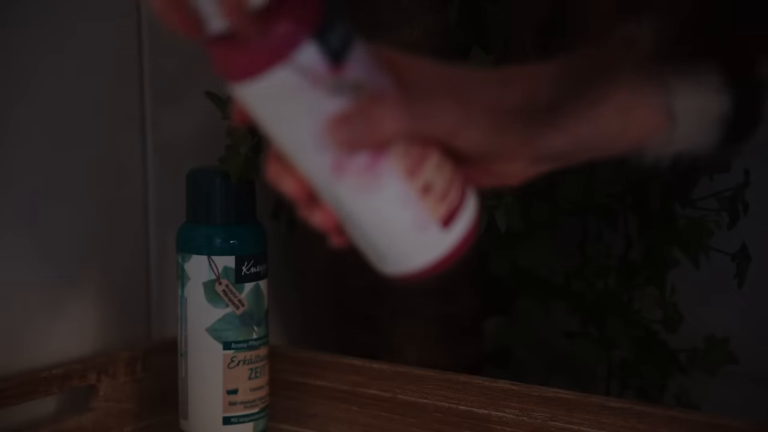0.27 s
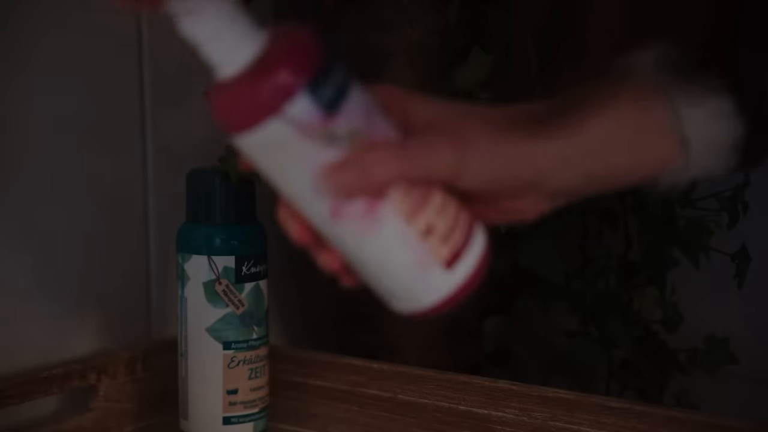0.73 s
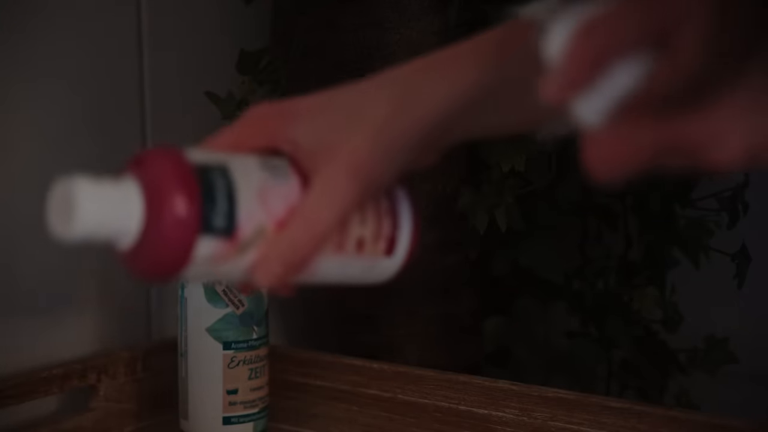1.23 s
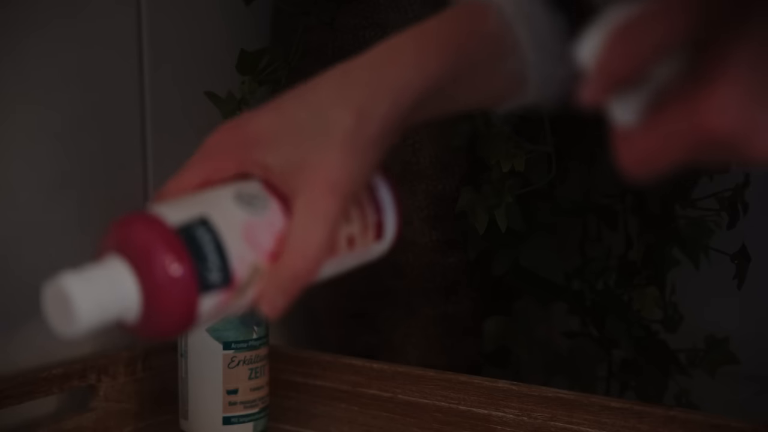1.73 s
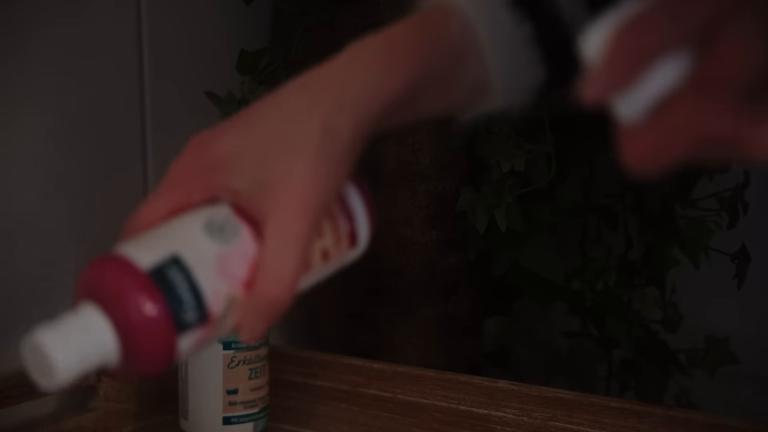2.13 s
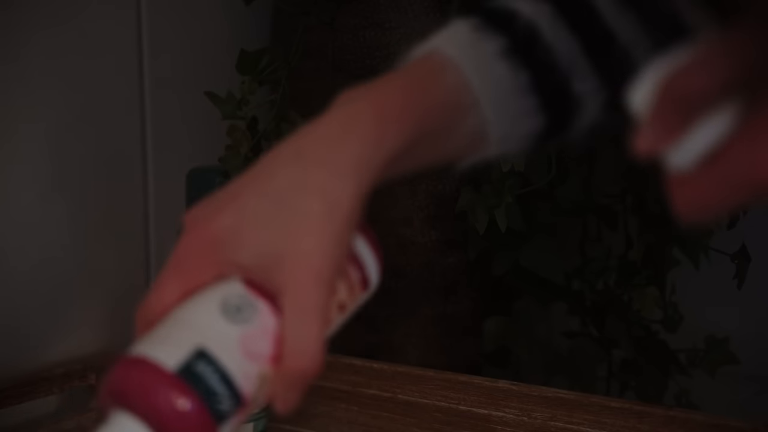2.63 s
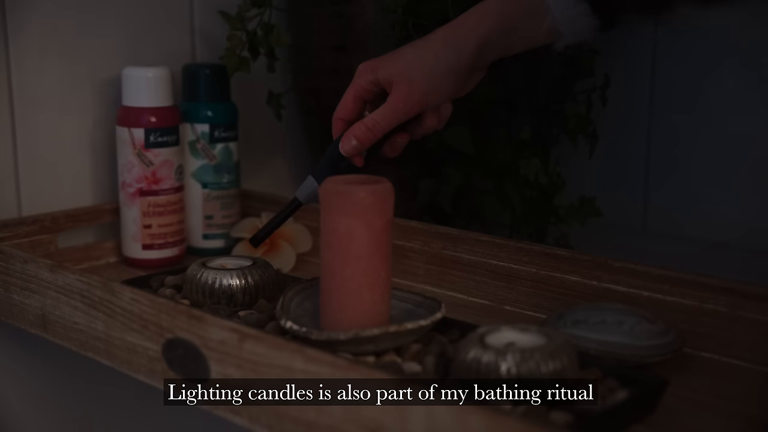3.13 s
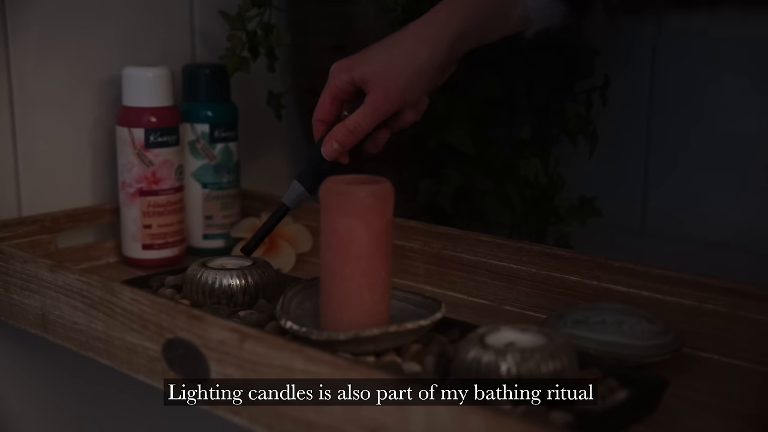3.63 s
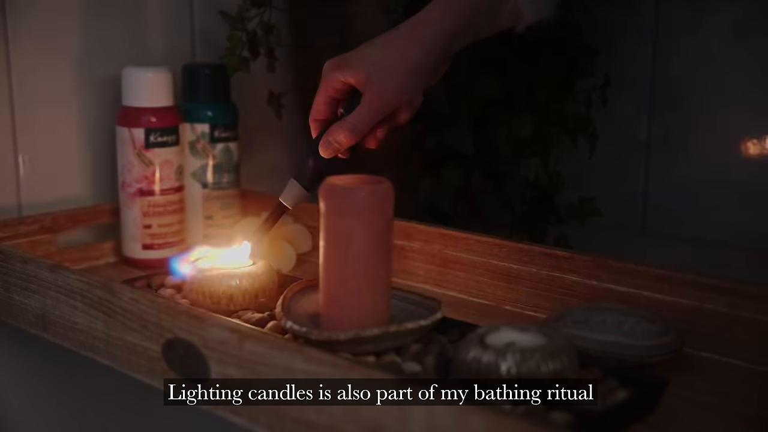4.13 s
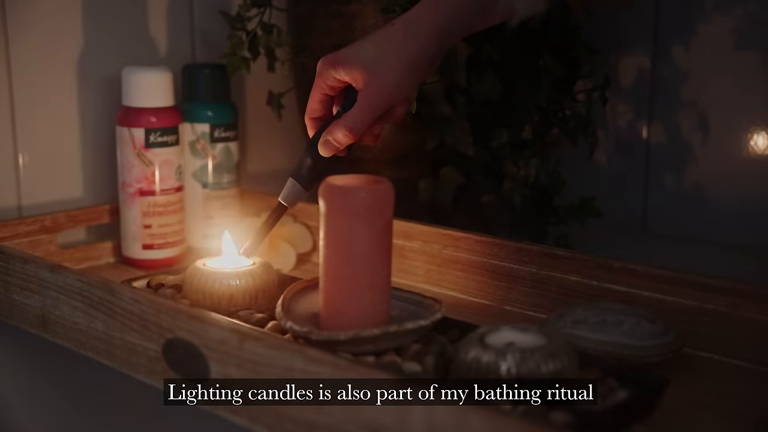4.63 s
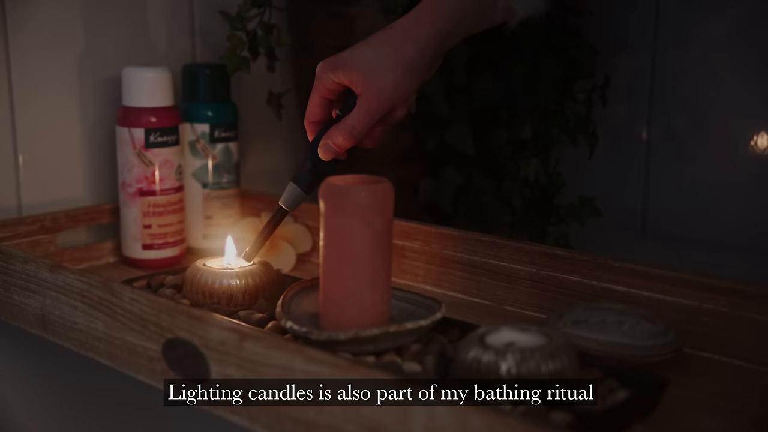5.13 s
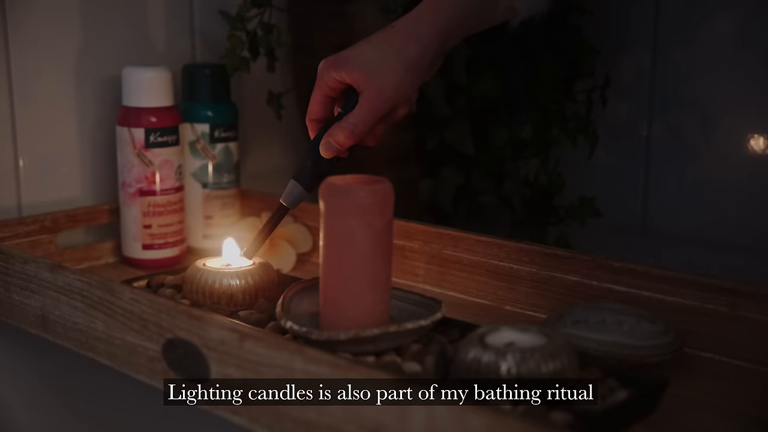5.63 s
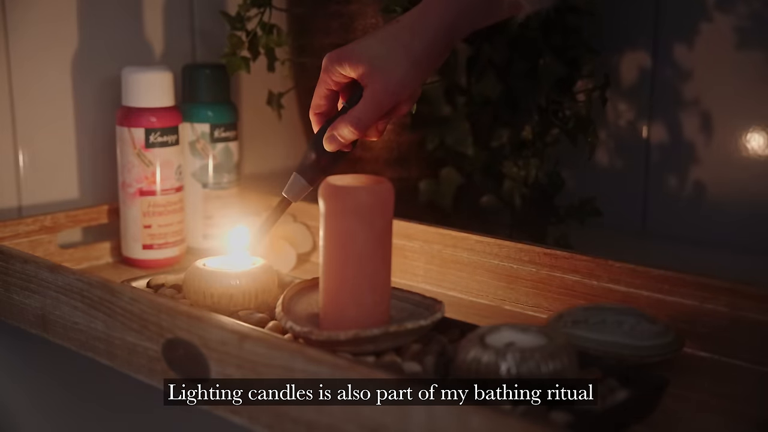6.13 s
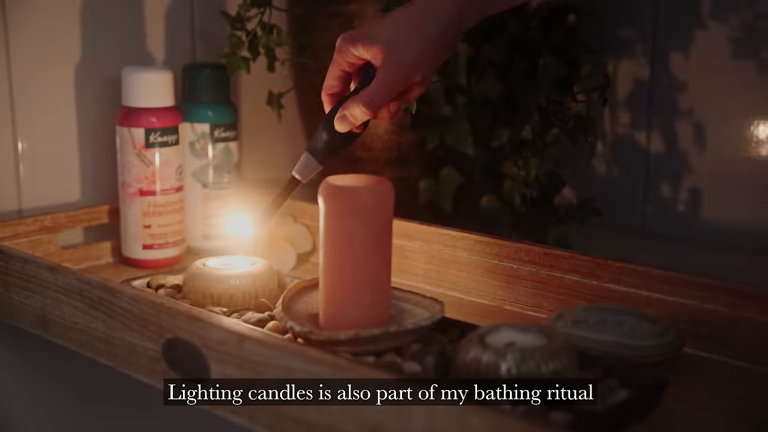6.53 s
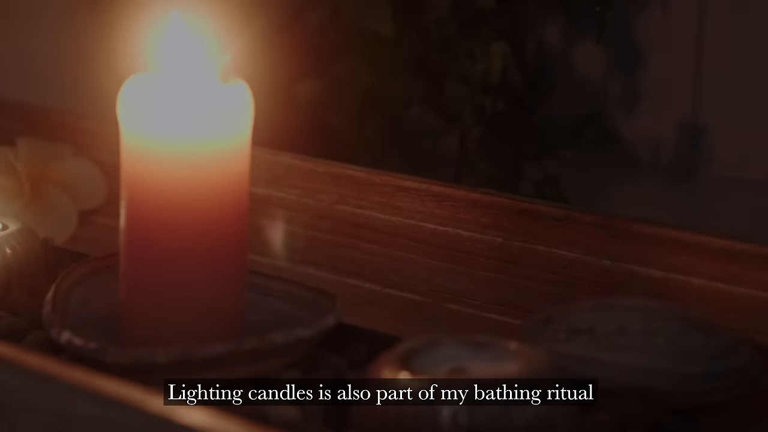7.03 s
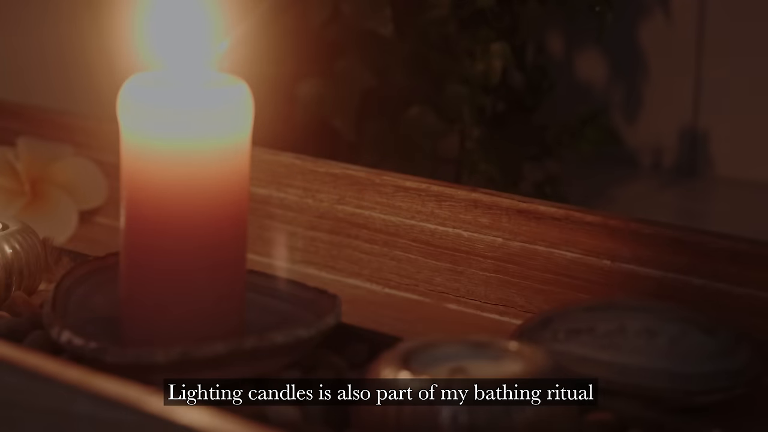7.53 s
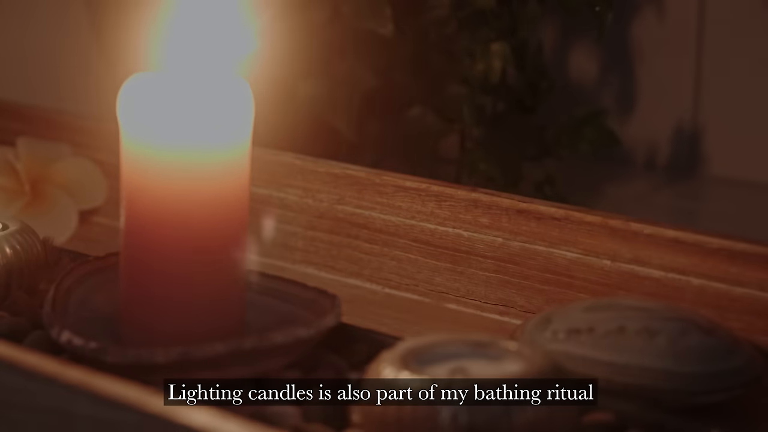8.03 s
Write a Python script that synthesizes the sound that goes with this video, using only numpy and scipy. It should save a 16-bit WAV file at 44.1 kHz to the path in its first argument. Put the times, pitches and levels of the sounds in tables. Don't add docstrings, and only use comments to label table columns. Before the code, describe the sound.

A bright, bubbly tap stream fills a bathtub and fades smoothly. Then near silence: cloth rubs briefly, a plastic lighter clicks and knocks in the hand, and its igniter cracks once, far louder than everything else, with a short tiled reverberation. Gas puffs softly; the nozzle scrapes a dish, a candle wick crackles, and a distant bird whistles barely audibly over low room tone. Essentially mono, in a small hard room.

```python
import sys
import numpy as np
from scipy import signal
from scipy.fft import rfft, irfft, next_fast_len
from scipy.io import wavfile
from scipy.ndimage import uniform_filter1d

SR = 44100
rng = np.random.default_rng(int(sys.argv[2]) if len(sys.argv) > 2 else 0)


def level_to_linear(level):
    exponent = np.asarray(level, float) / 20
    return 10 ** exponent


def to_wav(s):
    ch = np.atleast_2d(s).T
    pcm = np.round(np.clip(ch, -1, 1) * 32767)
    wavfile.write(sys.argv[1], SR, pcm.astype(np.int16))


N = 365141
CHANGE_S = 2.836
EDGE_HZ = 15760
HAMMER_DB_AFTER = 11


def clock():
    return np.arange(N) / SR


def evened(x):
    return x / np.sqrt(np.mean(x ** 2) + 1e-20)


def slow(seconds):
    size = max(round(seconds * SR), 2)
    once = uniform_filter1d(rng.standard_normal(N), size)
    return evened(uniform_filter1d(once, size))


def read(points, hz):
    f, value = np.transpose(points)
    return np.interp(np.log(hz + 1), np.log(f + 1), value)


def coloured(x, spectrum, peaks=()):
    size = next_fast_len(N)
    hz = np.fft.rfftfreq(size, 1 / SR)
    db = read(spectrum, hz)
    for f, width, boost in peaks:
        db = db + boost / (1 + (2 * (hz - f) / width) ** 2)
    return evened(irfft(rfft(x, size) * level_to_linear(db) * (hz < EDGE_HZ), size)[:N])


def causal(spectrum):
    db = read(spectrum, abs(np.fft.fftfreq(4096, 1 / SR)))
    log_gain = np.log(level_to_linear(np.maximum(db, -70)))
    taps = np.fft.ifft(np.exp(np.conj(signal.hilbert(log_gain)))).real[:1024]
    return taps / np.linalg.norm(taps)


def limited(x):
    return signal.oaconvolve(x, signal.firwin(511, EDGE_HZ, window=("kaiser", 9), fs=SR), "same")


def patchy(patchy_db, flicker_db, span):
    frames = N // 128 + 5
    a, b, patches = rng.standard_normal((frames, 257, 3)).T
    patches = uniform_filter1d(patches, 6, 0)
    patches = evened(uniform_filter1d(patches, span, 1))
    flicker = evened(uniform_filter1d(rng.standard_normal(frames), span // 2))
    z = (a + 1j * b) * level_to_linear(patchy_db * patches + flicker_db * flicker)
    return signal.istft(z, nperseg=512, noverlap=384)[1][:N]


def add(mix, s, sound):
    part = mix[round(s * SR):][:len(sound)]
    part += sound[:len(part)]


# frequency in Hz, time to fall by 60 dB in seconds.
TILE_DECAY = [(500, 0.67), (1320, 0.5), (3480, 0.44), (5400, 0.44), (7700, .35), (11000, 0.33),
              (15500, 0.2)]


def tiles(x):
    taps = rng.choice([-1., 1.], SR) * (rng.random(SR) < .3)
    hz, t, z = signal.stft(taps, SR, nperseg=128)
    decay = level_to_linear(-60 * t / read(TILE_DECAY, hz)[:, None])
    tail = signal.istft(z * decay, SR, nperseg=128)[1]
    build_up_s = 0.003
    tail = tail * (1 - np.exp(-(np.arange(len(tail)) / SR / build_up_s) ** 2))
    return signal.fftconvolve(x, tail / np.linalg.norm(tail))[:N]


def ticks(rows, modes):
    out, t = np.zeros(N), np.arange(600) / SR
    click = np.exp(-t * 18000) - .17 * np.exp(-t * 3000)
    for s, db, mode_db, top_db, thud_db, ms in rows:
        weights = [0, 0, mode_db, top_db, top_db, thud_db]
        body = level_to_linear(14 + top_db) * click
        for (hz, width, mode_gain), weight in zip(modes, weights):
            ring = np.exp(-np.pi * width * t) * np.sin(2 * np.pi * hz * t)
            body = body + level_to_linear(mode_gain + weight) * ring
        rattle = rng.standard_normal(600) * np.exp(-(1000 * t / max(ms, .15)) ** 2)
        tick = np.convolve(rattle, body)
        add(out, s, level_to_linear(db) * tick / abs(tick).max())
    return out


# frequency in Hz, density in dB per Hz.
HUSH = [(15, -60), (30, -22), (42, -4.5), (55, 1.5), (75, -9), (113, -17), (221, -15), (510, -19),
        (724, -20.5), (1080, -17.5), (1710, -24), (2780, -27.5), (5500, -36), (15600, -53.5)]
# frequency in Hz, width in Hz, boost in dB.
PIPE = [(1130, 30, 6.5), (955.4, 20, 5), (1230, 20, 2), (1470, 20, 6.5)]


def hush():
    room_db, hiss_db = -69.5, -80.5
    room = coloured(patchy(patchy_db=0.6, flicker_db=-0.7, span=30), HUSH, PIPE)
    return (level_to_linear(room_db) * room + level_to_linear(hiss_db) * rng.standard_normal(N)) * (clock() > CHANGE_S)


# time in seconds, level in dB.
SURGES = [
    (3.12, -75),
    (3.5, -79.5),
    (4.11, -71.5),
    (6.88, -77),
    (7.14, -80),
    (7.4, -75),
]


def drone():
    t = clock()
    level = level_to_linear(-87.5 + 3.5 * slow(seconds=.1))
    rise_s, fall_s = 0.033, 0.09
    for s, db in SURGES:
        level = level + level_to_linear(db) * np.exp(-np.maximum((s - t) / rise_s, (t - s) / fall_s))
    wander = evened(uniform_filter1d(rng.standard_normal(N), 3000))
    hz = 1090 + 5.5 * wander
    return (t > CHANGE_S) * level_to_linear(2.0) * level * np.sin(2 * np.pi * np.cumsum(hz) / SR)


# start in seconds, first, middle and last frequency in Hz, level in dB.
BIRD = [
    (6.0, 5950, 6920, 5650, -89),
    (7.9, 6450, 5860, 5000, -88),
]


def bird():
    whistle_s = .21
    out, u = np.zeros(N), np.arange(0, 1, 1 / (whistle_s * SR))
    for start, first_hz, middle_hz, last_hz, db in BIRD:
        arch = (2 * middle_hz - first_hz - last_hz) * 2 * u * (1 - u)
        hz = first_hz + (last_hz - first_hz) * u + arch
        add(out, start, level_to_linear(db) * np.sin(np.pi * u) * np.sin(2 * np.pi * np.cumsum(hz) / SR))
    return out * level_to_linear(1.6 * slow(seconds=.005))


# time in seconds, peak in dB, rattle length in milliseconds.
SPITS = [
    (6.8727, -40.5, 0.27),
    (6.8740, -45, 0.62),
    (6.8757, -46.5, 2.5),
    (6.9614, -64, 2.5),
]
# level in dB of the third mode, of the top, of the thud.
SPIT_COLOUR = (-6, -20, -4)
# frequency in Hz, width in Hz, level in dB.
WAX = [(2470, 500, -9), (3380, 1100, 14), (4600, 1200, 10), (7000, 1700, 2), (12500, 3300, 25),
       (466, 300, 5)]


def wick():
    return ticks([(s, db, *SPIT_COLOUR, ms) for s, db, ms in SPITS], WAX)


# frequency in Hz, density in dB per Hz.
CLOTH = [(88, -53), (150, -45), (297, 3), (348, -7), (504, -13), (612, -3.5), (960, -6.5), (1290, 2),
         (1630, -7), (2810, -5), (3160, -8), (12400, -20), (16000, -31)]


def sleeve():
    t = clock()
    top_s, settled_s = 2.984, 3.35
    before, after = np.maximum(top_s - t, 0), np.maximum(t - top_s, 0)
    stroke_db = -50.5 - 39 * before - 128 * after
    settle_db = -62.5 - 32 * after
    level_db = np.maximum(stroke_db, settle_db)
    bright_db = level_db - 11.5 - 41 * before
    clumps_db = 1.3 * uniform_filter1d(rng.exponential(1, N), 4) ** 2
    snags = evened(rng.standard_normal(N) * level_to_linear(np.minimum(clumps_db, 14)))
    rustle = evened(patchy(patchy_db=-2.0, flicker_db=-0.5, span=8))
    cloth = coloured(snags + 1.7 * rustle, CLOTH)
    low = signal.sosfiltfilt(signal.butter(4, 4800, fs=SR, output="sos"), cloth)
    moving = (t > CHANGE_S) & (t < settled_s)
    return moving * (level_to_linear(level_db) * evened(low) + level_to_linear(bright_db) * evened(cloth - low))


# start in seconds, length in seconds, first level in dB, last level in dB.
GRIP = [
    (2.836, 0.81, -68, -86.5),
    (3.9, 0.16, -93, -82),
    (4.9, .3, -92.5, -92),
    (5.6, 0.84, -91, -98),
]
# frequency in Hz, density in dB per Hz.
GRIP_RING = [(3000, -44), (4900, -8.5), (5400, -5.5), (5900, -9.5), (9000, -35)]


def grip():
    level = np.zeros(N)
    for start, length, first_db, last_db in GRIP:
        add(level, start, level_to_linear(np.linspace(first_db, last_db, round(length * SR))))
    rub = coloured(patchy(patchy_db=3.0, flicker_db=1.5, span=4), GRIP_RING)
    return uniform_filter1d(level, 400) * rub


# time in seconds, peak in dB.
CRISP = [(3.0944, -56), (3.1667, -51), (3.3692, -48.5), (3.5164, -52), (3.5534, -55.5), (5.7554, -56.5),
         (6.0694, -66), (6.1244, -62)]
DULL = [(3.4032, -51), (3.7648, -56.5), (3.9509, -55), (3.9814, -53.5), (4.0294, -60), (4.0522, -52),
        (4.9336, -62), (5.1094, -64), (5.1294, -63)]
KNOCK = [(2.8734, -45.5), (2.9891, -45), (3.2314, -50.5), (5.8684, -63), (7.9244, -66)]
# level in dB of the 5 kHz mode, of the top above 7 kHz, of the thud
# under 1.5 kHz, then rattle length in milliseconds.
CRISP_COLOUR = (-13, -11.5, -11.5, 4)
DULL_COLOUR = (-18, -25, -16.5, 4.5)
KNOCK_COLOUR = (-9, -16, 3, 4.5)
# frequency in Hz, width in Hz, level in dB.
SHELL = [(2500, 500, -14), (3640, 430, 1.5), (5304, 260, 10), (8975, 3300, 17.5), (13000, 3500, 15),
         (600, 400, 3.5)]
# time in seconds, peak in dB, top above 7 kHz in dB, scrape length in milliseconds.
SCRAPES = [
    (5.6204, -57, -30, 9.0),
    (5.6794, -49.5, -10, 5.0),
    (5.69, -53.5, -30, 3.0),
    (5.7034, -60, -26, 4.0),
    (6.184, -56, -26, 3.3),
    (6.3414, -59, -24, 3.5),
]
# frequency in Hz, width in Hz, level in dB.
DISH = [(2920, 500, 4), (3800, 1200, 7), (5450, 700, 6), (8500, 3000, 12), (12000, 3500, 16),
        (1300, 1200, 14)]


def lighter():
    kinds = [(CRISP, CRISP_COLOUR), (DULL, DULL_COLOUR), (KNOCK, KNOCK_COLOUR)]
    touches = [(*row, *colour) for rows, colour in kinds for row in rows]
    mode_db, thud_db = -3, -3
    scrapes = [(s, db, mode_db, top_db, thud_db, ms) for s, db, top_db, ms in SCRAPES]
    return ticks(touches, SHELL) + ticks(scrapes, DISH)


def flare():
    t = np.maximum(clock() - 4.095, 0)
    rise_s = .04
    level = np.minimum(t / rise_s, 1) * level_to_linear(-49.5 - 85 * t)
    spectrum = [(30, -6), (60, 1), (130, -8.5), (300, -10), (700, -10), (1100, -38.5)]  # (Hz, dB per Hz)
    return level * coloured(rng.standard_normal(N), spectrum)


# time in seconds, peak in dB.
SNAP = [
    (4.0894, -3.5),
    (4.0900, -5),
    (4.091, -3.5),
    (4.092, -6),
    (4.0926, -11),
    (4.0938, -11),
]


def thump():
    out, u = np.zeros(N), np.arange(0, 1, 140 / SR)
    add(out, SNAP[0][0], level_to_linear(-50) * np.sin(2 * np.pi * u) * np.sin(np.pi * u))
    return out


# frequency in Hz, density in dB per Hz.
HAMMER = [(290, -68.5), (500, -47), (952, -33.5), (1520, -13.5), (2040, -18.5), (3500, 4.5), (4050, -9),
          (4900, -1), (6560, -13), (11800, -14), (12700, -13.5), (15600, -28.5), (16500, -42.5),
          (17200, -70)]
# frequency in Hz, density in dB per Hz.
AFTER = [(290, -60), (500, -38.5), (1200, -24), (1770, -0.5), (2080, -14.5), (2330, -2.5), (3070, -4.5),
         (3590, -3), (4210, -10.5), (4720, -0.5), (5860, -15), (7380, -16), (8520, -23.5), (12400, -20),
         (15600, -27.5)]


def snap():
    direct, blow = np.zeros(N), np.zeros(N)
    contact_s = 0.00033
    dying = np.exp(-np.arange(300) / SR / contact_s)
    for s, db in SNAP:
        hit = np.convolve(rng.standard_normal(300) * dying, causal(HAMMER))
        add(direct, s, level_to_linear(db) * hit / abs(hit).max())
    add(blow, SNAP[0][0], causal(AFTER))
    return direct + level_to_linear(HAMMER_DB_AFTER) * limited(tiles(blow))


def bubble(hz, cycles, glide):
    u = np.arange(int(3 * cycles * SR / hz)) * hz / SR / cycles
    return np.sin(2 * np.pi * cycles * (u + glide * u ** 2)) * u * np.exp(1 - u * 2) * 2


def fizz():
    out, size = np.zeros(N), 3 * SR
    for hz in np.geomspace(250, 15000, 36):
        strength = level_to_linear(3.37 * np.minimum(rng.exponential(1, size), 4))
        births = (rng.random(size) < 200 / SR) * strength
        swarm = signal.oaconvolve(births, bubble(hz, cycles=5.5, glide=0.038))[:size]
        out[:size] += np.sqrt(hz) * evened(swarm)
    return out / out[:size].std()


# frequency in Hz, density in dB per Hz.
JET = [(110, -38.5), (180, -30.5), (209, -22), (417, -18.5), (475, -8), (703, -12), (897, -7), (1890, -6),
       (2370, -6), (2800, -1.5), (4640, -5), (5280, -2.5), (8420, -12), (12500, -12), (15600, -19.5)]
# frequency in Hz, width in Hz, boost in dB.
TUB = [(211.6, 21, 11), (324, 14, 2.5), (480.5, 12.2, 4.5), (536, 31, 0), (890, 76, 4.5), (1520, 120, 3),
       (1900, 100, 5.5), (2780, 40, 5), (3210, 200, 2), (3740, 500, 3.5), (5320, 460, 3.5)]
# time in seconds, peak in dB, pitch in Hz.
BUBBLES = [(0.03, -27.5, 3130), (0.063, -24, 2740), (0.176, -19, 2720), (0.294, -17.5, 3900),
           (0.308, -20, 1856), (0.343, -18, 5150), (0.471, -22, 3500), (0.574, -19, 4050),
           (0.647, -21, 3600), (0.749, -31, 1900), (0.948, -19.5, 3110), (1.14, -22, 2740),
           (1.24, -23.5, 3200), (1.326, -22, 2690), (1.519, -25.5, 2760), (1.634, -23, 3800),
           (1.831, -23, 3130), (1.955, -25.5, 1876), (2.17, -17, 3600), (2.319, -22, 3120)]
# frequency in Hz, density in dB per Hz.
RUMBLE = [(15, -48), (30, -18), (42, -4), (56, 6), (75, -3), (113, -8.5), (156, -14), (190, -13.5),
          (250, -17), (420, -93.5)]


def water():
    running = np.arange(N) < 3 * SR
    hiss = evened(patchy(patchy_db=1.16, flicker_db=2.2, span=14))
    splash = (0.52 * fizz() + 0.69 * hiss) * running
    splash = splash + 0.66 * tiles(splash)
    quarter = SR // 4
    splash[:quarter] += 0.6 * rng.standard_normal(quarter) * np.linspace(1, 0, quarter)
    splash = coloured(splash * running, JET, TUB)
    splash = level_to_linear(-30) * splash / splash[running].std()
    large = np.zeros(N)
    for s, db, hz in BUBBLES:
        add(large, s, level_to_linear(db - 5.5) * bubble(hz, cycles=9.7, glide=0.008))
    large = large + 0.92 * tiles(large)
    rumble = coloured(rng.standard_normal(N), RUMBLE)
    rumble = rumble * level_to_linear(-67.5 + 1 * slow(seconds=0.073))
    fade_from_s = 1.666
    fader = np.clip((CHANGE_S - clock()) / (CHANGE_S - fade_from_s), 0, 1)
    return (splash + large + rumble) * fader


def scene():
    steady = hush() + drone() + water()
    shell, wax = lighter(), wick()
    small = shell + wax + tiles(level_to_linear(-8.5) * shell + level_to_linear(-4) * wax)
    soft = steady + bird() + sleeve() + grip() + flare() + thump() + small
    mono = limited(soft) + snap()
    return np.array([mono, mono])


def band_limit(x):
    return signal.sosfilt(signal.butter(12, 17080, fs=SR, output="sos"), x)


# frequency in Hz, density in dB per Hz.
APART = [(15, -23), (25, 1), (668, -7.5), (974, -14), (1140, -27.5), (1270, -19), (2180, -17.5),
         (4280, -11), (15600, -10.5)]


def record(dry):
    side = level_to_linear(-86.5) * coloured(rng.standard_normal(N), APART) * (clock() > CHANGE_S)
    mix = dry + np.array([side, -side])
    return band_limit(mix)


dry = scene()
out = record(dry)
to_wav(out)
```